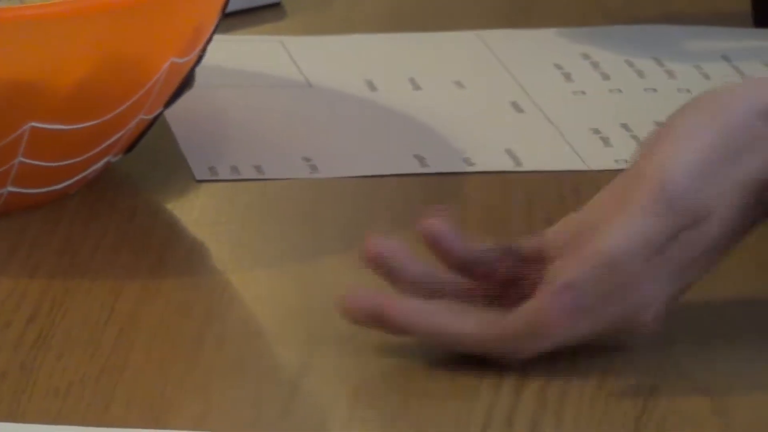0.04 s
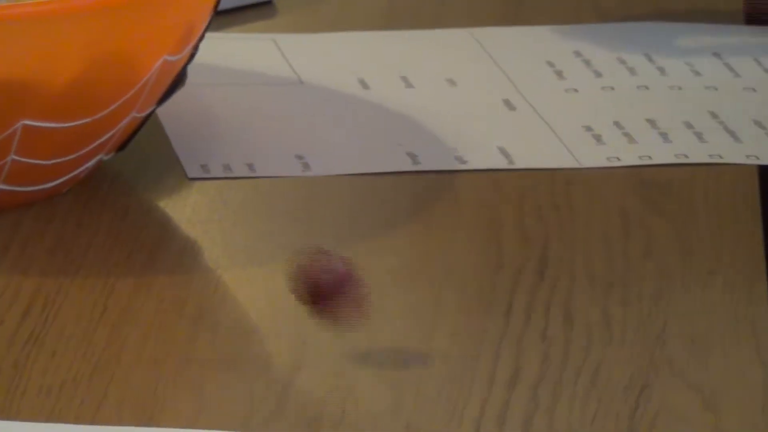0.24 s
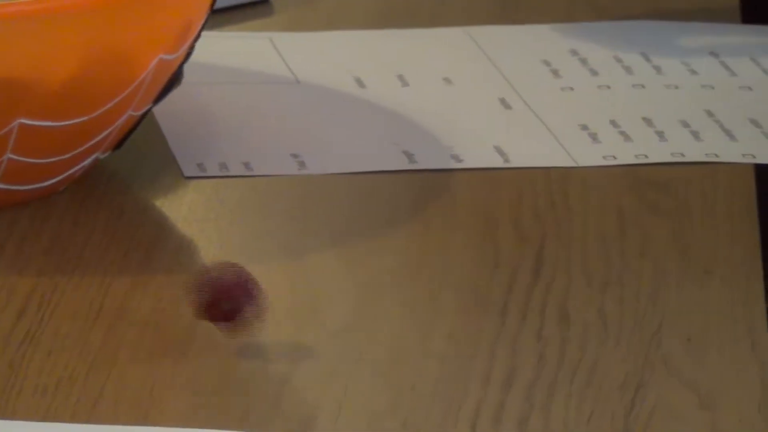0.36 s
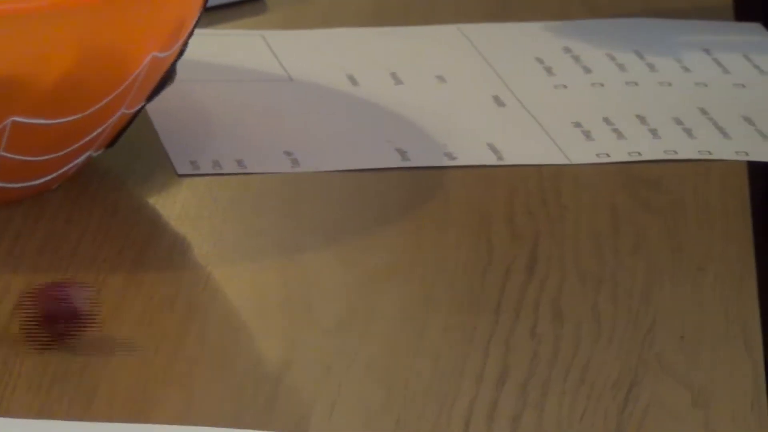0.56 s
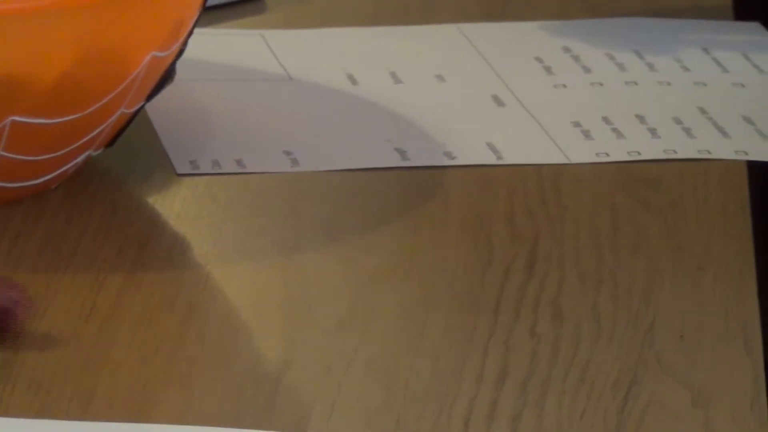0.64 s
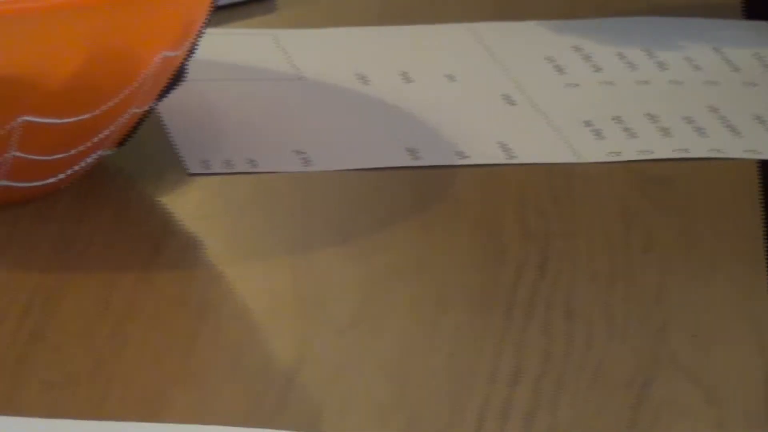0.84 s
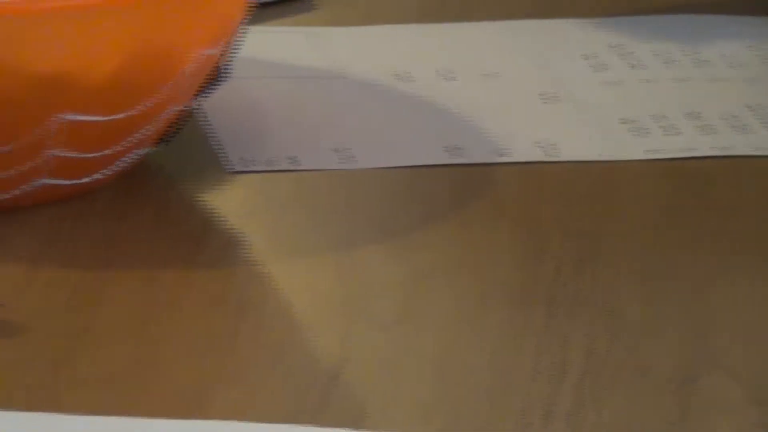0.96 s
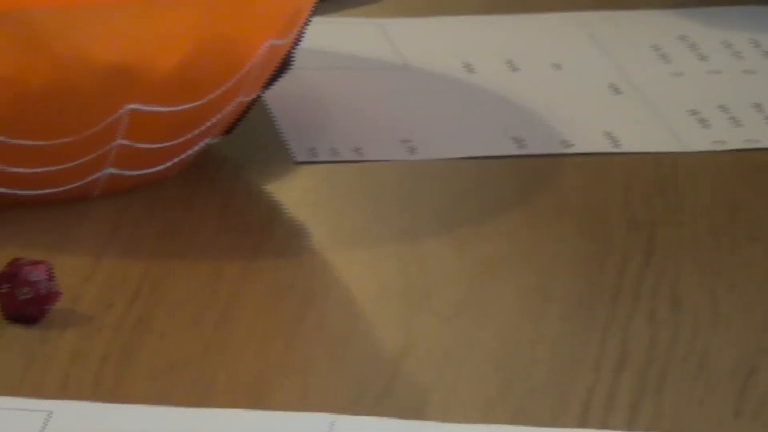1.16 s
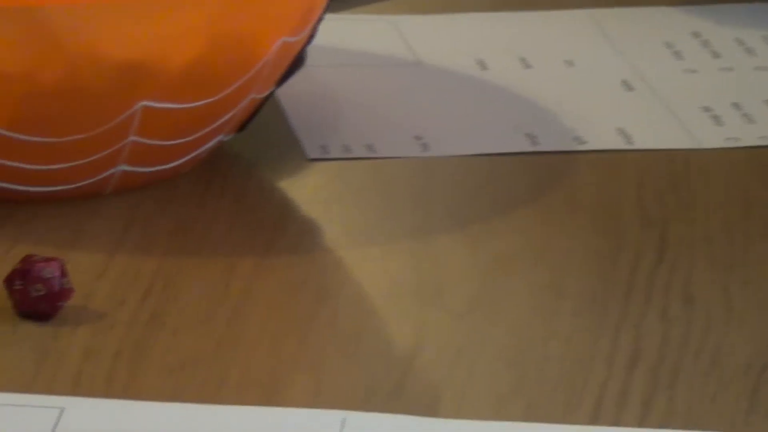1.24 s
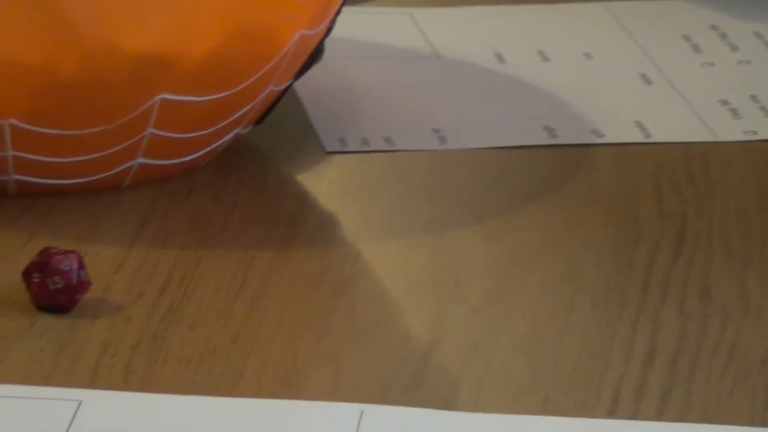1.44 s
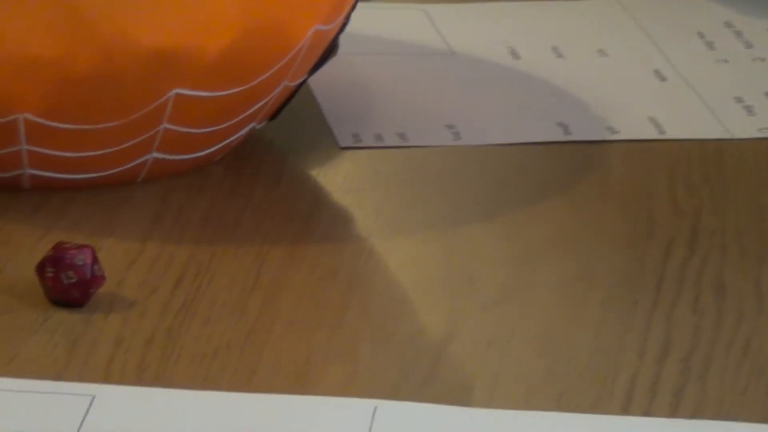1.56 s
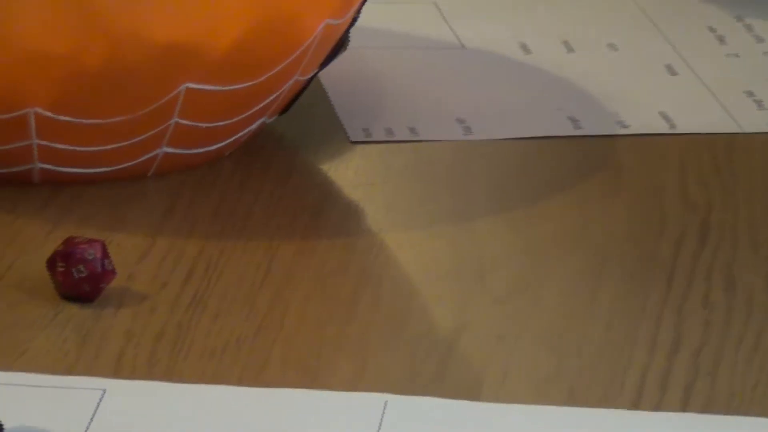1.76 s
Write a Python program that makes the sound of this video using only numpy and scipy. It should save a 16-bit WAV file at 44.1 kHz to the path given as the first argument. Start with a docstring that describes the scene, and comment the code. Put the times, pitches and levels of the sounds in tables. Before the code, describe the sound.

A thrown die clatters over wood, knocks against something hard, then light plastic ticks follow.

```python
"""A hard die is thrown on a wooden table: it bounces ever faster, tumbles and clacks on something hard.
Each bounce sends bending waves through the top, excites its modes and sets a small room reverberating.
A soft bump precedes the throw. A short ringing tick leads into the die's clack; light plastic
handling ticks follow, over quiet room noise. A limiter ducks the loud blows."""
import sys
import numpy as np
from scipy import signal
from scipy.fft import rfft, irfft, next_fast_len
from scipy.io import wavfile
from scipy.ndimage import uniform_filter1d, minimum_filter1d

SR = 44100
rng = np.random.default_rng(int(sys.argv[2]) if len(sys.argv) > 2 else 0)


def wrap_up_sound(samples):
    """Save the sound to the file named by the first command line argument, as 16-bit audio."""
    columns = np.atleast_2d(samples).T
    # keep every value between -1 and 1, then stretch to whole-number steps
    tamed = np.clip(columns, -1, 1)
    steps = np.round(tamed * 32767).astype(np.int16)
    wavfile.write(sys.argv[1], SR, steps)


N = 79380
T = np.arange(SR * 3 // 4) / SR  # seconds since an impact


def amp(db):
    """Amplitude grows tenfold for every 20 dB."""
    return 10 ** (np.asarray(db) / 20)


def along(points, hz):
    """Interpolation of (frequency, value) points on a logarithmic frequency axis."""
    freqs, values = np.transpose(points)
    return np.interp(np.log(hz + 1), np.log(freqs + 1), values)


def fade(t60):
    """Damping gives an exponential decay, 60 dB in t60 seconds."""
    return np.exp(-np.log(1000) * T / t60)


def normed(x):
    """Normalisation of a stereo pair to a mean energy of 1 per channel."""
    return x / np.sqrt(np.sum(x ** 2) / 2)


def filtered(x, response):
    """Linear filtering multiplies the spectrum by a frequency response."""
    n = x.shape[-1]
    padded = next_fast_len(n + 2048)
    return irfft(rfft(x, padded) * response(np.fft.rfftfreq(padded, 1 / SR)), padded)[..., :n]


def noise(colour, size=len(T)):
    """Partial coherence: coloured noise of rms 1, mostly alike in both ears."""
    # Likeness of the ears. Each row: frequency in Hz, left-right correlation.
    coherence = [(30, 0.99), (200, 0.88), (500, 0.8), (1200, 0.75), (4000, 0.72), (12000, 1)]

    def response(hz):
        angle = np.arccos(np.clip(along(coherence, hz), -1, 1)) / 2
        return amp(along(colour, hz)) * np.array([np.cos(angle), np.sin(angle)])
    mid, side = filtered(rng.standard_normal((2, size)), response)
    pair = np.array([mid + side, mid - side])
    return pair / pair.std()


def brighter(colour, treble_db, corner_hz=3060):
    """A shelf raises or lowers a spectrum above its corner frequency."""
    return [(hz, db + treble_db / (1 + (corner_hz / hz) ** 4)) for hz, db in colour]


def add(out, start_s, x):
    """Superposition: x adds to the sound already in out."""
    part = out[:, round(start_s * SR):][:, :x.shape[-1]]
    part += x[..., :part.shape[1]]


def air():
    """The quiet room and microphone hiss form a broadband noise floor."""
    # Noise spectrum. Each row: frequency in Hz, relative level in dB.
    spectrum = [(15, -32), (25, -6.5), (156, -2.5), (322, -0.5), (445, -6.5), (741, -4), (1110, -5),
                (2060, -10.5), (2560, -10.5), (3530, -12.5), (4260, -15.5), (15500, -18.5)]
    # Slow drift of the floor. Each row: time in seconds, level in dB.
    drift = [(0, -54.5), (.12, -54.5), (1.2, -51.5), (1.55, -52), (1.8, -53)]
    return noise(spectrum, size=N) * amp(np.interp(np.arange(N) / SR, *np.transpose(drift)))


def bump(level_db=-52, centre_s=0.035, width_s=0.038):
    """Low noise under a Gaussian envelope is heard as a soft bump."""
    # Bump spectrum. Each row: frequency in Hz, relative level in dB.
    spectrum = [(50, -38), (150, 9), (260, 0), (500, -5), (1200, -27), (6000, -24)]
    envelope = np.exp(-((np.arange(N) / SR - centre_s) / width_s) ** 2)
    return amp(level_db) * noise(spectrum, size=N) * envelope


def bounces():
    """Impact excitation: each contact pushes the wood, snaps the die and rings the top and the room."""
    # Contacts. Each row: start in seconds, strength in dB, snap gain in dB (more on an edge than a face).
    contacts = [(0.1996, 12.5, 4), (0.3252, 10, 2), (0.4125, 5, -2.5), (.4580, 2, -2), (0.4884, -2, -4),
                (0.5178, 1, 0.5), (0.5606, 1.5, -2.5), (0.5653, 0.5, -3), (0.5989, -0.5, -7.5),
                (0.62, 1, -5), (.6607, 1, -3), (.6750, 0, -11), (0.6954, 0.5, -5), (.7128, -2, 1),
                (0.7356, 0, 1.5), (0.751, -8.5, -1), (0.7588, 1, -6.5), (0.7775, 0, -7),
                (0.7824, -3.5, 1.5), (0.7975, -6, -17), (0.8, -15, -19), (0.8091, -9, -19),
                (0.8195, -6, -17), (0.8363, -11, -7)]
    # Spectra of the push, the top's dense ring and the die's snap.
    # Each row: frequency in Hz, relative level in dB.
    push_spectrum = [(40, -53), (120, -31), (300, -15.5), (650, 0), (1100, 8), (2200, 5.5), (2900, -6),
                     (3700, -58.5), (5500, -23.5), (11000, -38), (15500, -53)]
    wood_spectrum = [(50, -40), (180, -24.5), (330, -15.5), (600, -5.5), (1000, -3.5), (1400, -3.5),
                     (2100, -6.5), (2800, -11), (3600, -29), (4700, -23.5), (6500, -33.5), (11000, -36),
                     (16000, -53)]
    snap_spectrum = [(1000, -2), (3500, -1), (5000, -4), (7000, 2), (11000, 3), (13000, -1), (15500, -17)]
    # Low modes of the table. Each row: frequency in Hz, level in dB, 60 dB decay time in seconds.
    table_modes = [(151.3, -47, 0.51), (253.2, -36, 0.21), (278.4, -37, 0.43), (414.9, -32, 0.31),
                   (544.4, -35.5, 0.43), (620, -30, 0.12), (938, -28.5, 0.38), (993, -31, 0.67),
                   (1128, -34, 0.084), (1427, -23, 0.083)]
    # A faster blow is shorter and drives more of the top: dB gained per dB of strength.
    treble_slope, body_slope, bass_slope = 0.3857, 0.42, 0.19
    ring_rise_s, modes_rise_s = 0.0016, 0.0083
    ring_onset = 1 - np.exp(-(T / ring_rise_s) ** 2)
    modes_onset = 1 - np.exp(-T / modes_rise_s)
    push = dispersed(pulse(push_spectrum))
    push_size = np.linalg.norm(push)
    out = np.zeros((2, N))
    for start_s, db, snap_db in contacts:
        wood = brighter(wood_spectrum, treble_slope * db)
        ring = normed(noise(wood) * fade(t60=0.036) * ring_onset)
        snap = amp(snap_db - 16) * normed(noise(snap_spectrum) * fade(t60=0.0061))
        low = amp(bass_slope * db) * modes(table_modes, scatter_db=3.5) * modes_onset
        body = amp(body_slope * db) * (amp(-4.5) * ring + amp(1) * room(wood))
        add(out, start_s, amp(db - 6) * (push + push_size * (snap + body) + low))
    return out


def pulse(colour, size=2048):
    """A minimum-phase pulse of peak 1: its energy arrives as early as its spectrum allows."""
    cepstrum = irfft(np.log(amp(along(colour, np.fft.rfftfreq(size, 1 / SR)))))
    cepstrum[1:size // 2] *= 2  # folding onto positive time makes the pulse causal
    cepstrum[size // 2 + 1:] = 0
    wave = irfft(np.exp(rfft(cepstrum)))
    return np.pad(wave / np.abs(wave).max(), (0, len(T) - size))


def dispersed(push):
    """Dispersion: treble bending waves run faster, so a push becomes a falling chirp, which echoes."""
    # Reflections from things on the table. Each row: delay in seconds, gain in dB.
    echoes = [(.0016, -15), (.003, -17)]
    travel_s = 0.00032  # group delay at 1 kHz

    def response(hz):
        bending = np.exp(-4j * np.pi * travel_s * np.sqrt(1000 * hz))
        reflected = sum(amp(db) * np.exp(-2j * np.pi * hz * delay_s) for delay_s, db in echoes)
        return bending * (1 + reflected)
    return filtered(push, response)


def modes(table, scatter_db):
    """Normal modes are damped sines; the struck spot sets their strength and sign, here at random."""
    return sum(amp(db + scatter_db * rng.normal()) * rng.choice([-1, 1])
               * fade(t60) * np.sin(2 * np.pi * hz * T) for hz, db, t60 in table)


def room(colour):
    """Reverberation builds up, swells with the far wall's echoes and lasts longest in the midrange."""
    # Reverberation times. Each row: frequency in Hz, 60 dB decay time in seconds.
    decay_times = [(150, 0.29), (1000, 0.55), (2500, 0.43), (6000, 0.36), (14000, 0.27)]
    rise_s, wall_s, wall_width_s, wall_db = 0.011, 0.0395, 0.0033, 8
    hz, t, spectra = signal.stft(noise(colour), SR, nperseg=256)
    decay = np.exp(-np.log(1000) * t / along(decay_times, hz)[:, None])
    tail = signal.istft(spectra * decay, SR, nperseg=256)[1][:, :len(T)]
    onset = 1 - np.exp(-(T / rise_s) ** 2)
    wall = amp(wall_db * np.exp(-((T - wall_s) / wall_width_s) ** 2))
    return normed(tail * onset * wall)


def ticks():
    """Light impacts excite a snap, a heavily damped ring and a soft thud."""
    # The lead-in to the die's clack, then plastic being handled. Each row: start in seconds, level in dB,
    # ring frequency in Hz, ring gain in dB, thud gain in dB, treble shelf of the snap in dB.
    contacts = [(0.8442, -43, 3600, 14.5, -20, -6), (1.156, -51.5, 3480, 8, -18, -17),
                (1.2464, -37.5, 2670, 13, -5, -12.5), (1.258, -43.5, 2690, 13, -14, -4),
                (1.271, -36, 2800, -11, -4.5, 0), (1.341, -44, 3100, 2, -4.5, 1),
                (1.3532, -45, 5230, -2, 3.5, 9), (1.3997, -40, 2070, 3.5, -6.5, 20),
                (1.438, -52, 2130, 10, 1.5, 8), (1.4683, -37, 2950, -14, -8, 0),
                (1.479, -48.5, 3050, 9, -13, -3), (1.4976, -48.5, 3040, 11.5, 3, -5),
                (1.5125, -61, 2950, 4, -6, -7), (1.538, -43, 2230, 3, -18, -9),
                (1.559, -44.5, 2260, 6, 6, -3), (1.5665, -45.5, 3100, 2.5, 2, -10),
                (1.581, -46.5, 2200, 7, -9, -6), (1.629, -44, 2200, 4.5, -3.5, -10),
                (1.6479, -44, 3100, 0.5, 1, -15), (1.666, -45, 2280, -6, -7, -10)]
    # Spectra of the snap and the thud. Each row: frequency in Hz, relative level in dB.
    snap_spectrum = [(60, -34), (300, -13), (1500, -6.5), (3000, 2), (5500, -1.5), (8000, -8), (10000, -6),
                     (15000, -24)]
    thud_spectrum = [(60, -15), (180, -11), (270, 4.5), (400, -7.5), (900, -5.5), (2000, -15), (8000, -57)]
    out = np.zeros((2, N))
    for start_s, db, hz, ring_db, thud_db, treble_db in contacts:
        snap = noise(brighter(snap_spectrum, treble_db)) * fade(t60=0.03)
        thud = amp(thud_db - 5.5) * noise(thud_spectrum) * fade(t60=0.091)
        ring = amp(ring_db) * rough_ring(hz)
        add(out, start_s, amp(db) * placed(snap + ring + thud, room_db=-4.5, pan_db=-3.5))
    return out


def rough_ring(hz, relative_width=0.073):
    """Close modes beat like narrow-band noise, here with the energy of one damped sine."""
    step = 1 + relative_width
    band = [(hz / step ** 4, -40), (hz / step, -6), (hz, 0), (hz * step, -6), (hz * step ** 4, -40)]
    decay = fade(t60=0.022)
    return normed(noise(band) * decay) * np.linalg.norm(decay * np.sin(2 * np.pi * hz * T))


def placed(x, room_db, pan_db):
    """A level difference, left minus right, sets a sound to one side; convolution adds the room."""
    flat = [(20, 0), (20000, 0)]
    reverb = signal.fftconvolve(x.mean(0)[None], room(flat), axes=1)[:, :len(T)]
    return x * amp([[pan_db / 2], [-pan_db / 2]]) + amp(room_db) * reverb


def clacks():
    """Hard bodies touch briefly, so the spectrum is wide: a bright double crack, later a faint one."""
    # Hard contacts. Each row: start in seconds, level in dB.
    contacts = [(.8480, -19), (.8491, -25), (1.7637, -36.5)]
    # Crack spectrum. Each row: frequency in Hz, relative level in dB.
    spectrum = [(50, -36.5), (300, 4.5), (1500, -3), (3000, -7), (4700, -15), (5500, -9), (7800, -3),
                (8700, -0.5), (9500, 1), (10800, 5.5), (12200, -8), (15500, -11)]
    # Short resonances. Each row: frequency in Hz, level in dB, 60 dB decay time in seconds.
    resonances = [(3480, -23, 0.027), (5460, -14, 0.026), (8300, -23, 0.021), (10020, -21, 0.036)]
    out = np.zeros((2, N))
    for start_s, db in contacts:
        crack = noise(spectrum) * fade(t60=0.016) + modes(resonances, scatter_db=1)
        add(out, start_s, amp(db) * placed(crack, room_db=-4, pan_db=-2))
    return out


def scene():
    """The sound pressures of all sources add linearly."""
    return air() + bump() + bounces() + ticks() + clacks()


def record(dry):
    """Look-ahead limiting ducks each loud blow and recovers steadily; a low-pass limits the band."""
    ceiling_db, lookahead_s, release_db_per_s, top_hz = -5, 0.0023, 290, 15900
    ahead = round(lookahead_s * SR)
    peak_db = 20 * np.log10(np.abs(dry).max(0) + 1e-9)
    needed_db = np.minimum(0, ceiling_db - peak_db)
    recovery_db = release_db_per_s * np.arange(N) / SR
    held_db = np.minimum.accumulate(needed_db - recovery_db) + recovery_db
    gain_db = uniform_filter1d(minimum_filter1d(held_db, 2 * ahead), ahead)
    return filtered(dry * amp(gain_db), lambda hz: hz < top_hz)


dry = scene()
out = record(dry)
wrap_up_sound(out)
```